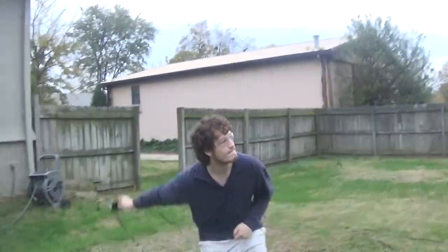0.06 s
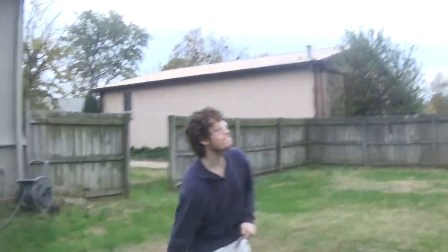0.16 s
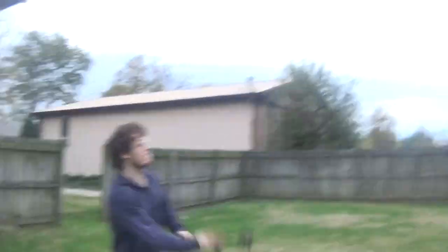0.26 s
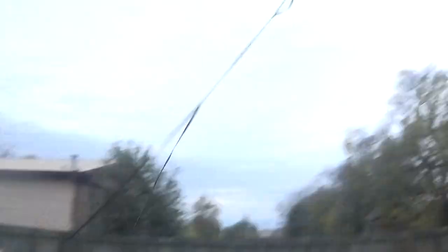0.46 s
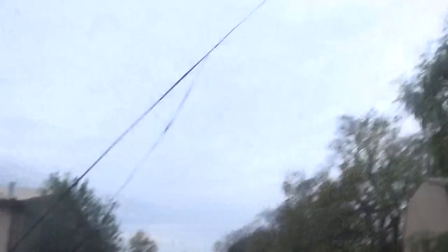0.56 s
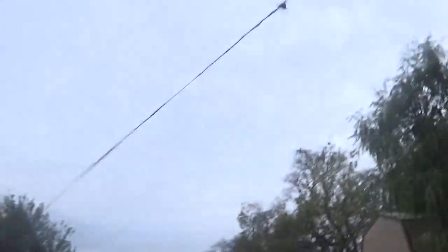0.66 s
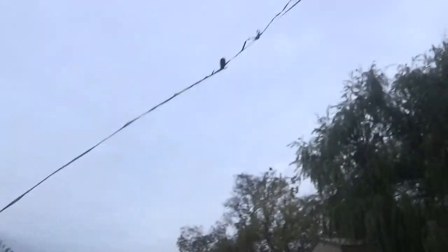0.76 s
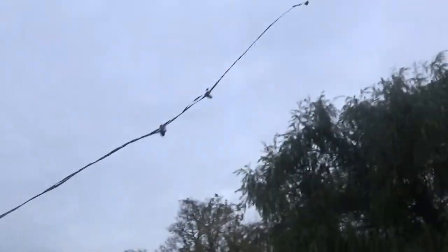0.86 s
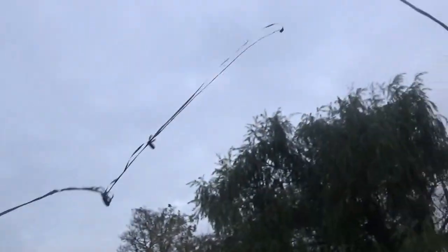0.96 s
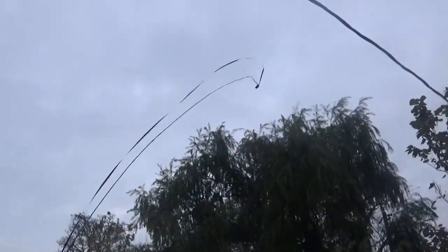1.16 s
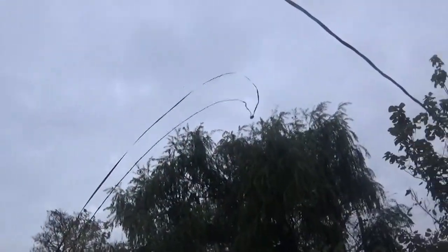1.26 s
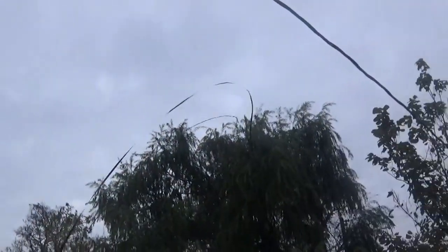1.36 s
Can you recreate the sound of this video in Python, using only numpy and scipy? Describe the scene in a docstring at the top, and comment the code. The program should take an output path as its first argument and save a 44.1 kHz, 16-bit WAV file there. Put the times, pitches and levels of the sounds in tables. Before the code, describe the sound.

Thrown tape unspools with a crinkling rush, then flaps and snaps away in light wind.

```python
"""A long strand of thin tape thrown across a back yard, heard from a stereo microphone beside the thrower.
Creases pop in the film: a loud crinkling rush as it sizzles off the spool close by, then separate flaps
and snaps as it flutters on through the air, farther off and wider in the image. The arm swishes, the spool
whooshes, and the microphone is bumped once as it swings upward. Low wind and a distant murmur lie beneath."""
import sys
import numpy as np
from scipy import signal
from scipy.fft import rfft, irfft
from scipy.io import wavfile
from scipy.ndimage import uniform_filter1d

SR = 44100
rng = np.random.default_rng(int(sys.argv[2]) if len(sys.argv) > 2 else 0)


def dump(signal):
    """Clip the signal to [-1, 1] and save it as 16-bit WAV at the path in sys.argv[1]."""
    limited = np.clip(np.atleast_2d(signal).T, -1, 1)
    pcm = np.round(limited * 32767).astype(np.int16)
    wavfile.write(sys.argv[1], SR, pcm)


N = 61739
T = np.arange(N) / SR
CREASES_PER_S, CREASE_SPREAD_DB = 17000, 4.5
# spectrum of a crease popping in the thin film: freq_hz, relative_db
FILM_COLOUR = [(300, -33.5), (1200, -19.5), (2500, -19.5), (4500, -15), (6000, -12), (7600, -6.5),
               (9400, -2), (10500, -0.5), (11600, -3.5), (13200, -7.5), (15700, -15)]


def from_db(db):
    """Decibels to gain."""
    return 10 ** (np.asarray(db) / 20)


def rms_one(x):
    """Scale to unit rms."""
    return x / np.sqrt(np.mean(x ** 2) + 1e-20)


def curve(rows):
    """Join (time_s, value) points by straight lines."""
    return np.interp(T, *np.transpose(rows))


def response(points, size=4096):
    """Minimum-phase impulse response through (freq_hz, gain_db) points."""
    hz, db = np.transpose(points)
    freqs = np.maximum(np.arange(size // 2 + 1) * SR / size, 1)
    gain = from_db(np.interp(np.log(freqs), np.log(hz), db))
    cepstrum = irfft(np.log(gain))
    cepstrum[1:size // 2] *= 2
    cepstrum[size // 2 + 1:] = 0
    return irfft(np.exp(rfft(cepstrum)))


def colour(x, points):
    """Filter to a colour while keeping the power of white input."""
    h = response(points)
    return signal.fftconvolve(x, h / np.sqrt(np.sum(h ** 2)))[:N]


def stereo(mid, scattered, width):
    """Add a scattered part, filtered by width, with opposite signs left and right."""
    side = signal.fftconvolve(scattered, response(width))[:N]
    return np.array([mid + side, mid - side])


def pan(x, db):
    """Lean a stereo sound to the left by db."""
    return x * np.array([from_db(db / 2), from_db(-db / 2)]).reshape(2, -1)


def drift(rate_hz):
    """Smooth random wander of rms 1."""
    size = max(int(SR / rate_hz / 2), 1)
    return rms_one(uniform_filter1d(uniform_filter1d(rng.standard_normal(N), size), size))


def swell(centre_s, width_s):
    """A bell-shaped rise and fall."""
    return np.exp(-2 * ((T - centre_s) / width_s) ** 2)


def swells(rows):
    """Gain of (centre_s, width_s, level_db) swells that add in power."""
    return np.sqrt(sum(from_db(db) ** 2 * swell(s, width) for s, width, db in rows))


def creases(per_s):
    """Random tiny clicks of uneven size; rms 1."""
    sizes = from_db(CREASE_SPREAD_DB * np.minimum(rng.exponential(1, N), 3))
    signs = rng.choice([-1, 1], N)
    return rms_one(sizes * signs * (rng.random(N) < per_s / SR))


def jolts(times_s, levels_db, crumple_db=-7, decay_s=.00055):
    """A single click at each time, followed by a tiny dying crumple."""
    out = np.zeros(N)
    for s, db in zip(times_s, levels_db):
        age = (np.arange(N) - int(s * SR)) / SR
        crumple = from_db(crumple_db) * (age > 0) * np.exp(-np.abs(age) / decay_s)
        out += from_db(db) * ((age == 0) + crumple * rng.choice([-1, 1], N))
    return out


def wind(level_db=-50.5, side_db=-33, gust_db=1.5, gusts_per_s=13):
    """Low wind rumbles in light gusts in the middle of the image."""
    # spectrum of the rumble: freq_hz, relative_db
    rumble_colour = [(20, -20), (45, -8.5), (70, -1.5), (100, -2.5), (145, -2.5), (190, -10.5), (400, -34),
                     (2000, -40)]
    gusts = from_db(level_db + gust_db * drift(gusts_per_s))
    mid, scattered = [gusts * colour(white, rumble_colour) for white in rng.standard_normal((2, N))]
    side = from_db(side_db) * scattered
    return np.array([mid + side, mid - side])


def murmur(level_db=-46.5, pan_db=-.7):
    """The distant surroundings of the yard, wide and leaning slightly right."""
    # spectrum of the murmur: freq_hz, relative_db
    murmur_colour = [(60, -15), (240, -8), (305, -0.5), (360, -5), (600, -5.5), (800, -3.5), (910, 0),
                     (1040, -2), (1180, -3.5), (1400, -6), (2200, -17.5), (5000, -27), (15000, -58)]
    # its stereo width: freq_hz, side_minus_mid_db
    width = [(150, -19), (350, -17.5), (850, -10), (1500, -7.5), (4000, -6.5)]
    mid, scattered = [colour(white, murmur_colour) for white in rng.standard_normal((2, N))]
    return from_db(level_db) * pan(stereo(mid, scattered, width), pan_db)


def handling():
    """One soft bump on the microphone: a push, a pull and a push."""
    # pressure pulses: centre_s, width_s, signed_pressure
    pulses = [(0.716, 0.0063, 0.0041), (0.729, 0.0068, -.018), (0.738, .004, 0.0034)]
    return sum(pressure * swell(s, width) for s, width, pressure in pulses)


def stirred_air():
    """The arm swishes past the microphone and loops of tape push out short puffs of air."""
    # the arm's pass: centre_s, width_s, level_db
    arm_pass = [(.311, 0.013, -40), (.337, 0.028, -43.5)]
    # spectrum of the swish: freq_hz, relative_db
    swish_colour = [(70, -16), (130, -8), (195, 7), (340, -7), (520, 0), (750, -5), (1200, -8), (2500, -14),
                    (8000, -38)]
    # puffs from the loops: centre_s, width_s, level_db
    puffs = [(.487, 0.0037, -33), (.522, 0.0065, -48), (.58, 0.0067, -46), (.735, 0.0068, -39.5)]
    # spectrum of a puff: freq_hz, relative_db
    puff_colour = [(60, -34), (170, -6), (280, 3), (450, 2.5), (750, 6), (1100, 10.5), (1500, -13),
                   (2500, -7), (8000, -48)]
    swish = colour(swells(arm_pass) * rng.standard_normal(N), swish_colour)
    return swish + colour(swells(puffs) * rng.standard_normal(N), puff_colour)


def spool_whoosh(width_hz=130):
    """Eddies behind the thrown spool: a hollow, narrow band of noise gliding upward."""
    # path of the band: time_s, pitch_hz, level_db
    glide = [(.27, 600, -66), (.308, 699, -36.5), (.322, 760, -51), (.338, 1025, -47), (0.383, 1202, -48),
             (.45, 1280, -60), (.55, 1250, -90)]
    s, hz, db = np.transpose(glide)
    phase = 2 * np.pi * np.cumsum(np.interp(T, s, hz)) / SR
    eddies = drift(width_hz) * np.cos(phase) + drift(width_hz) * np.sin(phase)
    return from_db(np.interp(T, s, db)) * eddies


def peel(flutter_db):
    """A narrow, close sizzle as the tape peels off the spinning spool."""
    # course of the sizzle: time_s, level_db
    sizzle_level = [(0, -58), (.12, -50.5), (.18, -47), (.22, -31), (.26, -46), (.295, -29.5), (.32, -25),
                    (.36, -22.5), (.395, -19), (.44, -26), (.52, -40), (.65, -49), (.8, -60), (1.4, -77.5)]
    # its spectrum: freq_hz, relative_db
    sizzle_colour = [(2000, -40), (6500, -30), (7800, -11), (9400, 0), (10400, -3), (11600, -8),
                     (13200, -14), (15700, -25)]
    return colour(from_db(curve(sizzle_level) + flutter_db) * creases(CREASES_PER_S), sizzle_colour)


def snaps(tick_gain_db=4, crack_gain_db=1):
    """The strand snaps taut: a bright tick of the film with a duller crack under it."""
    # each snap: start_s, tick_relative_db, crack_relative_db
    taut_moments = [(.0397, -24, -39), (.0567, -31, -45), (.199, -22, -26), (.2143, -14, -45),
                    (.265, -16, -34), (.3307, -15, -20), (.405, -18, -23), (.4866, -20, -18),
                    (.5122, -8, -29), (.6236, -15, -15), (.8425, -24, -46), (.8544, -20, -43),
                    (1.0364, -19, -37), (1.0814, -23, -36), (1.1709, -24, -34), (1.3467, -18, -45),
                    (1.3885, -23, -44)]
    # spectrum of the crack: freq_hz, relative_db
    crack_colour = [(200, -17), (900, -8), (2000, 2.5), (3800, 5.5), (6000, -5), (12000, -13)]
    start_s, tick_db, crack_db = np.transpose(taut_moments)
    ticks = colour(jolts(start_s, tick_db + tick_gain_db), FILM_COLOUR)
    return ticks + colour(jolts(start_s, crack_db + crack_gain_db), crack_colour)


def tape(flutter_db, crinkle_gain_db=1.5, flap_gain_db=-2.5):
    """Creases pop in the film: a fluttering crinkle, a cluster at each flap, a duller rush and rasps."""
    # the continuous crinkle: time_s, relative_db
    crinkle_level = [(0, -53), (.08, -49.5), (.12, -46), (.18, -46), (.215, -36.5), (.255, -36),
                     (.285, -30), (.325, -24), (.4, -24.5), (.45, -24), (.57, -24.5), (.68, -26),
                     (.735, -28), (.8, -36.5), (.88, -41.5), (1.0, -42.5), (1.16, -41), (1.23, -35),
                     (1.4, -36.5)]
    # the strand flaps in the air: centre_s, width_s, relative_db
    flap_bursts = [(.199, .004, -29.5), (.232, .004, -35), (.266, 0.0066, -22.5), (.312, 0.0047, -15),
                   (.326, 0.0045, -26), (.339, .003, -19.5), (.375, .008, -25), (.391, 0.013, -22.5),
                   (.410, 0.014, -18), (.461, .004, -28), (.489, .008, -17.5), (.524, .005, -21),
                   (.553, 0.0096, -15), (.583, 0.019, -18), (.598, 0.0023, -31), (.608, 0.0053, -16),
                   (.622, 0.0046, -22), (.649, 0.0068, -17), (.727, .012, -27), (.757, 0.0024, -34),
                   (.772, .0055, -25), (.829, .0045, -42), (.904, 0.0055, -33), (.919, 0.004, -36),
                   (.932, 0.0024, -30), (.948, 0.007, -32), (.990, 0.0031, -35), (1.005, .003, -26),
                   (1.011, 0.0023, -33), (1.023, 0.0027, -31), (1.036, 0.0028, -28.5), (1.049, 0.0028, -27),
                   (1.065, 0.0044, -27), (1.073, 0.0032, -28.5), (1.124, 0.0021, -29.5),
                   (1.139, 0.0027, -29), (1.200, .004, -36), (1.245, 0.0024, -29), (1.258, 0.0053, -34),
                   (1.348, 0.006, -40)]
    # tape paying out near the microphone: time_s, level_db
    rush_level = [(0, -60), (.24, -49), (.295, -36.5), (.33, -35), (.36, -37), (.46, -40.5), (.52, -33),
                  (.59, -37.5), (.65, -37.5), (.70, -41.5), (.742, -35.5), (.80, -46), (.95, -46),
                  (1.07, -46), (1.4, -53)]
    # spectrum of the rush: freq_hz, relative_db
    rush_colour = [(80, -19.5), (220, 4.5), (500, 2), (1200, -4), (2500, 2), (4500, -0.5), (6500, 5.5),
                   (9000, 1.5), (15000, -38)]
    # the strand rasps against itself: centre_s, width_s, level_db
    rasp_bursts = [(.332, 0.0058, -38), (.487, 0.0048, -27), (.522, 0.0035, -35), (.553, 0.0085, -36),
                   (.581, 0.0068, -33), (.712, 0.0063, -27.5), (.744, 0.0024, -32), (.886, 0.0033, -36.5),
                   (.947, .005, -36), (.975, 0.006, -44), (1.036, 0.0027, -39), (1.064, 0.0032, -43),
                   (1.123, .003, -46), (1.247, 0.0093, -41.5)]
    # spectrum of a rasp: freq_hz, relative_db
    rasp_colour = [(500, -6.5), (1500, -12), (3500, -3), (6200, 1.5), (9000, 0), (15000, -10)]
    crinkle = from_db(curve(crinkle_level) + crinkle_gain_db + flutter_db) * creases(CREASES_PER_S)
    flaps = from_db(flap_gain_db) * swells(flap_bursts) * creases(per_s=8900)
    rush = from_db(curve(rush_level) + flutter_db) * creases(per_s=4000)
    rasps = swells(rasp_bursts) * creases(per_s=4000)
    return colour(crinkle + flaps, FILM_COLOUR) + colour(rush, rush_colour) + colour(rasps, rasp_colour)


def scene(flutter_depth_db=1.5):
    """The tape starts close and narrow and widens as it flies off across the yard."""
    # more of its sound arrives scattered with distance: time_s, gain_db
    scatter_gain = [(0, -25), (.2, -7), (.38, -2.5), (.55, -0.5), (.75, 3.5), (1.0, 4.5), (1.4, 6)]
    # filter from the scattered sound to the side channel: freq_hz, gain_db
    width = [(200, -25), (900, -10.5), (2200, -21.5), (4500, -16.5), (7500, -15), (9500, -15.5),
             (12000, -24), (15000, -58)]
    # the tape's drift across the image: time_s, left_minus_right_db
    balance = [(0, 0), (.3, .2), (.55, -.4), (.85, -1.1), (1.1, -.7), (1.4, .3)]
    flutter_db = flutter_depth_db * drift(rate_hz=170)
    direct = tape(flutter_db) + peel(flutter_db) + snaps()
    scattered = from_db(curve(scatter_gain)) * tape(flutter_db)  # same swells, independent creases
    strand = pan(stereo(direct, scattered, width), curve(balance))
    return strand + stirred_air() + spool_whoosh() + wind() + murmur() + handling()


def record(dry):
    """The top is cut steeply."""
    cutoff_hz = 15720
    return signal.sosfilt(signal.ellip(12, .1, 80, cutoff_hz, fs=SR, output="sos"), dry)


dry = scene()
out = record(dry)
dump(out)
```